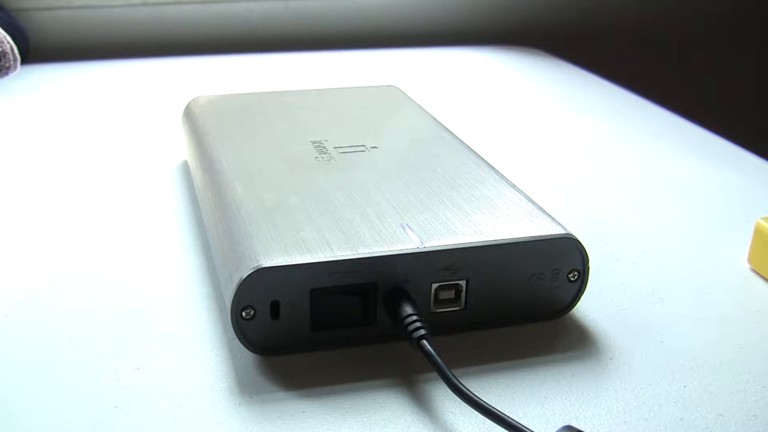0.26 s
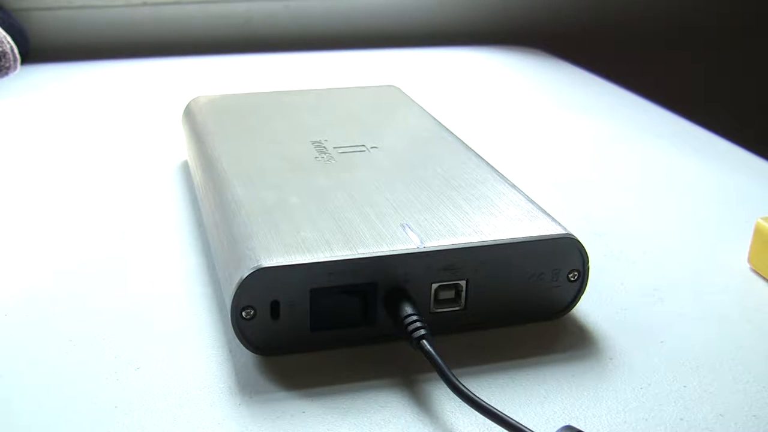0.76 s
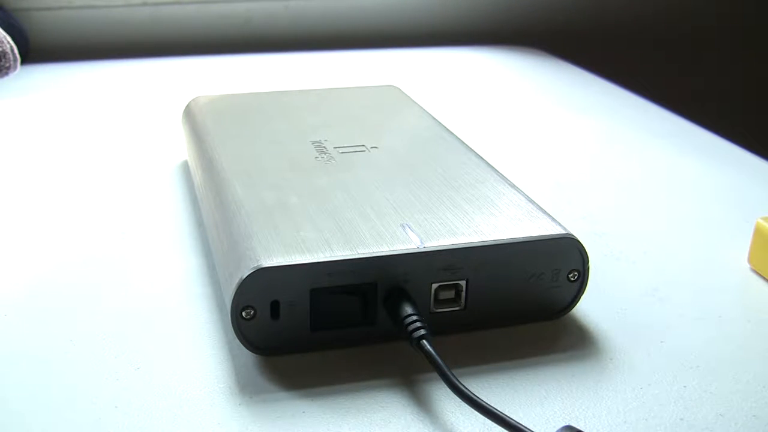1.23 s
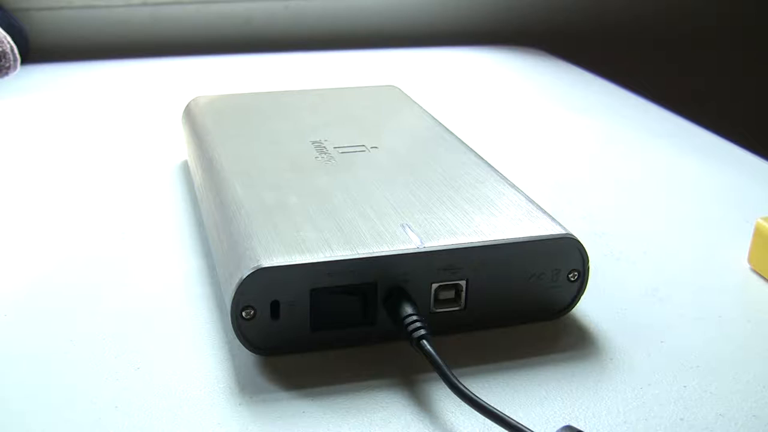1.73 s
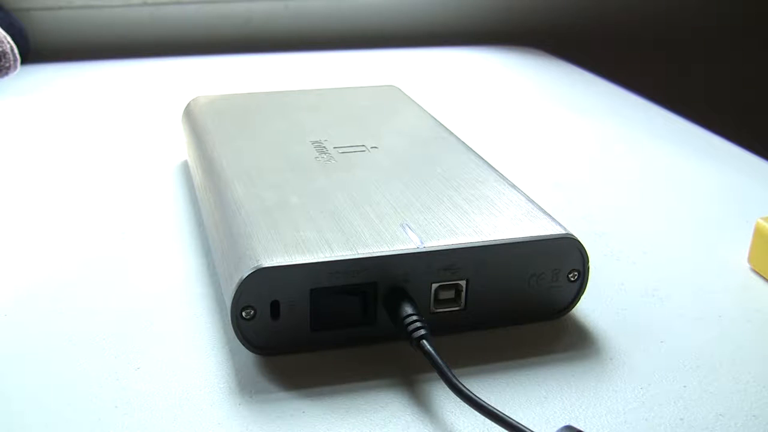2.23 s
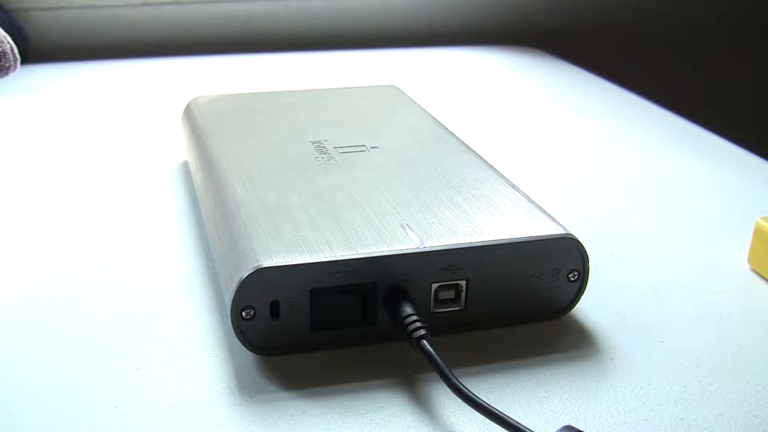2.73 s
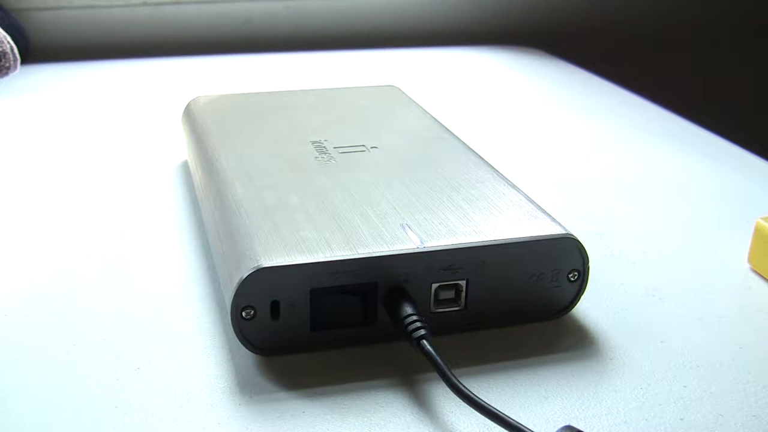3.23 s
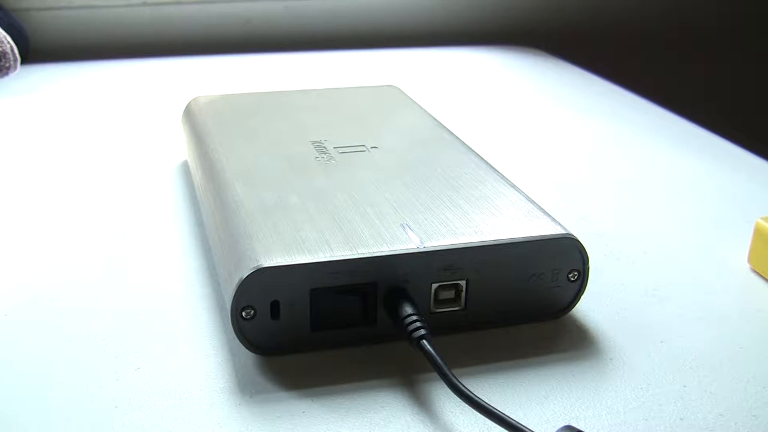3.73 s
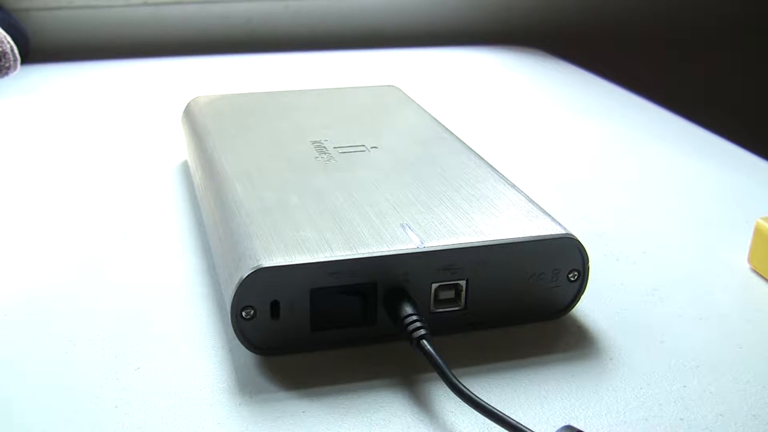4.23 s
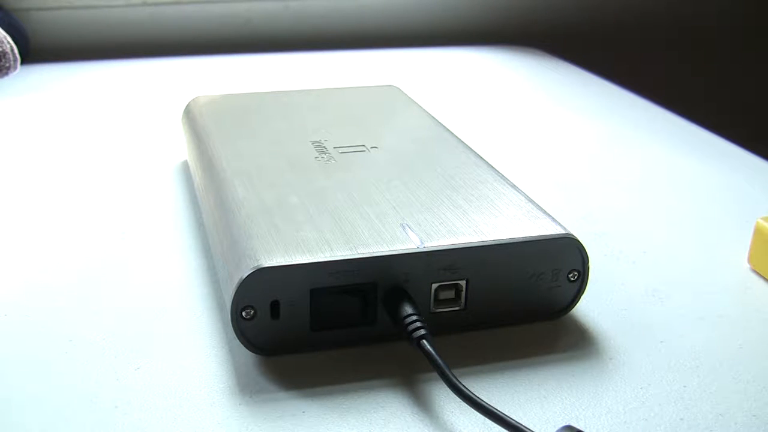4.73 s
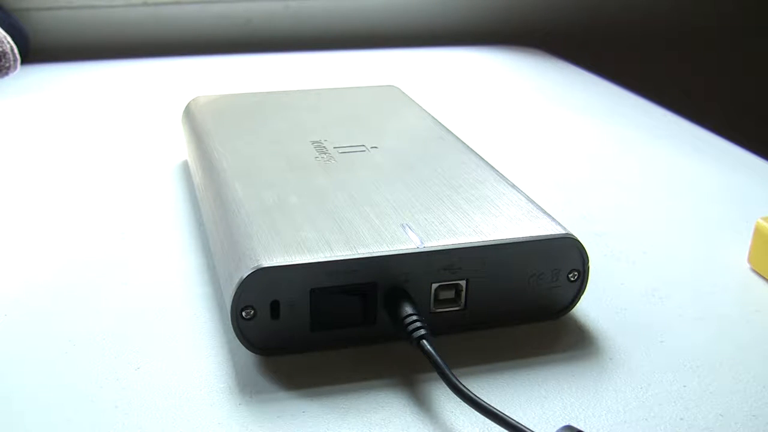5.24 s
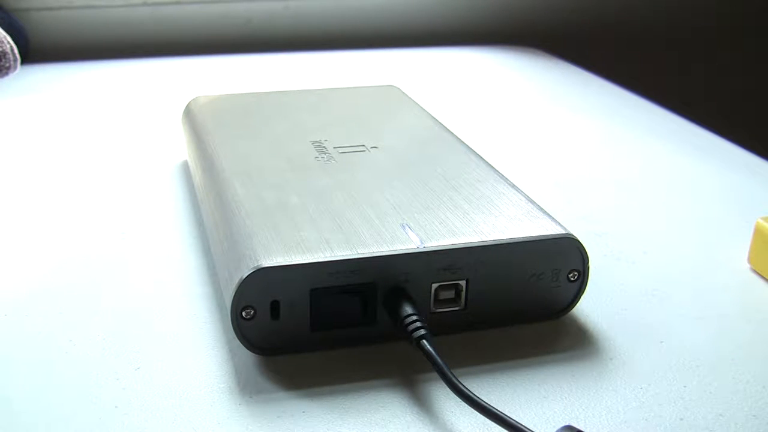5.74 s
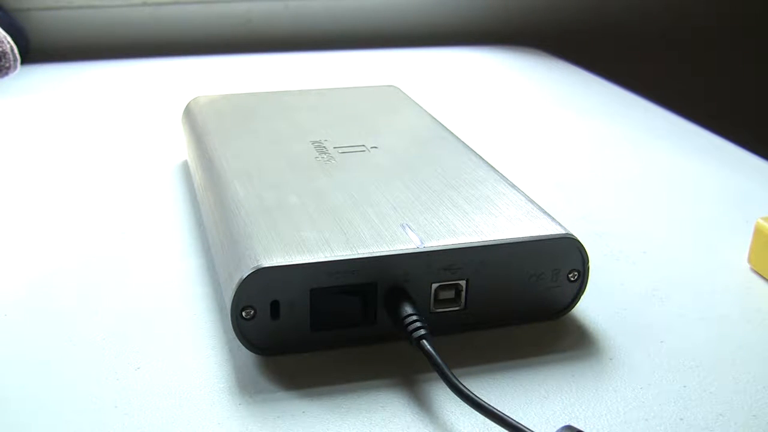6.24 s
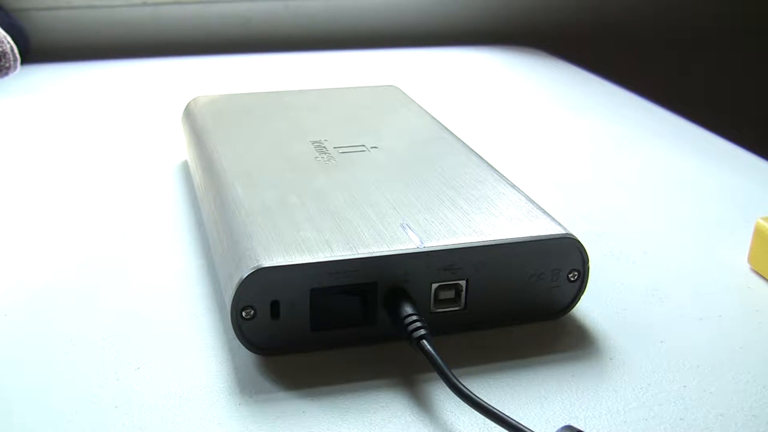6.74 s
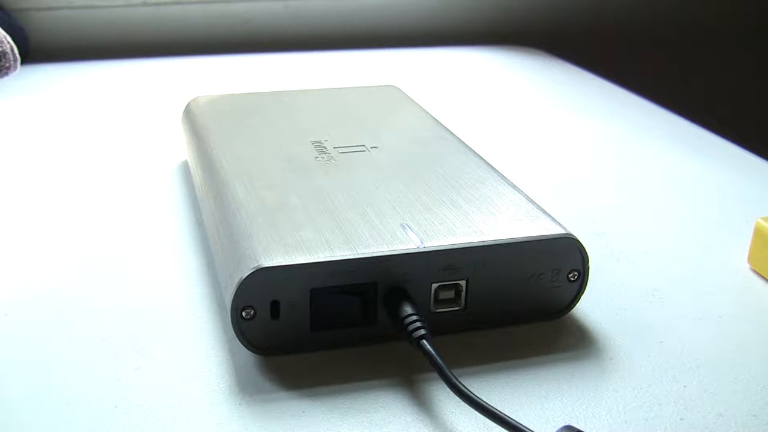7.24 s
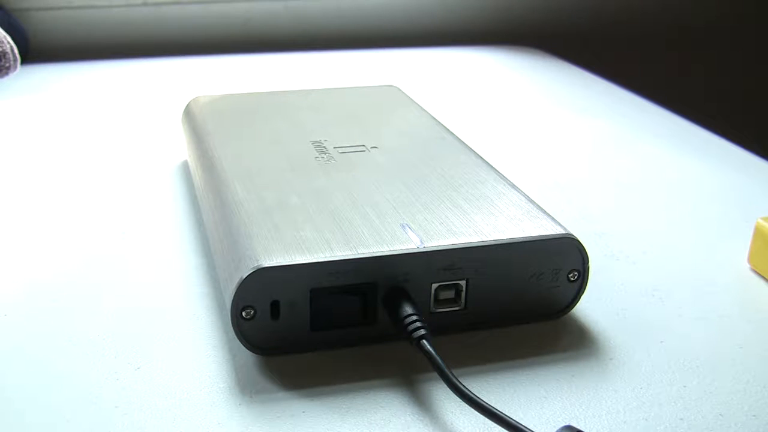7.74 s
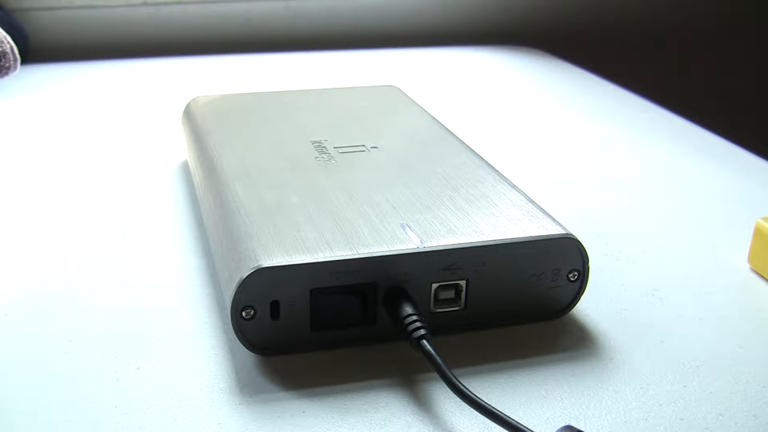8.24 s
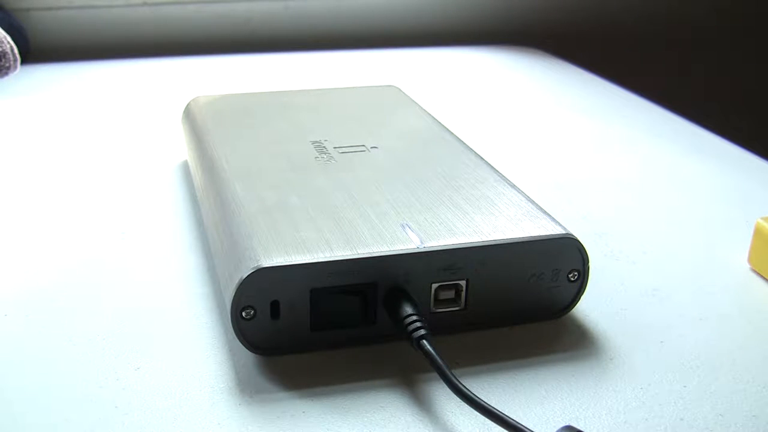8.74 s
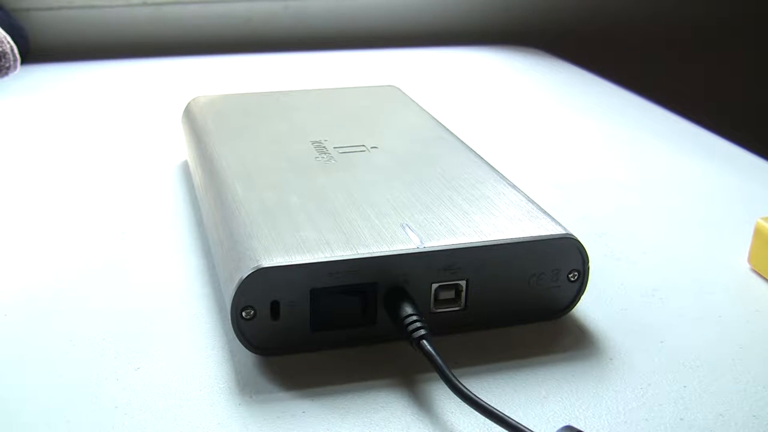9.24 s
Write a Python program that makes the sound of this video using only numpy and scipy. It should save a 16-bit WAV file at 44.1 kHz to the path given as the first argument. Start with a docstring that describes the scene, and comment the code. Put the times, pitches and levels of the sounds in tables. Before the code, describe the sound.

Close up in a quiet room, a small disk motor climbs to a steady whirr, followed by ten identical cycles of tick, clack, buzz and double knock.

```python
"""A failing hard drive in a metal case on a desk, heard close up through two microphone ports in a quiet room.
Over steady filtered noise and hums, the spindle whines up to speed: tones locked to its turn climb through
fixed resonances, then hold as a steady whine. The arm then repeats one cycle: two small ticks with faint
whistles, a load knock with a rebound, a short buzzing flight over the platters and a hard double knock at
its stop. Each contact rings decaying case modes and a noise rattle, and is reflected by desk and wall."""
import sys
import numpy as np
from scipy import signal
from scipy.fft import rfft, irfft
from scipy.io import wavfile

SR = 44100
rng = np.random.default_rng(int(sys.argv[2]) if len(sys.argv) > 2 else 0)


def log_audio(samples):
    """Write samples as a 16-bit WAV file to the path given in sys.argv[1]."""
    # one column per channel
    frames = np.atleast_2d(samples).T
    # limit to full scale, then quantise
    limited = np.clip(frames, -1, 1)
    pcm = np.round(limited * 32767).astype(np.int16)
    wavfile.write(sys.argv[1], SR, pcm)


N = 418068

# Noise spectra of room, platter wind and preamp hiss, relative: pitch_hz, level_db (per Hz)
AIR_MID_SPECTRUM = [(8, -11), (15, 6), (27, -10.5), (45, -8), (85, -12), (140, -14), (320, -27.5),
                    (650, -21.5), (1130, -26), (1400, -31), (2050, -29), (3620, -36), (4270, -35.5),
                    (4800, -39.5), (6640, -39.5), (9400, -39), (11700, -36.5), (13000, -53), (16000, -38)]
AIR_SIDE_SPECTRUM = [(8, -40), (15, -9), (31, -13), (85, -10), (140, -21), (390, -24.5), (940, -11),
                     (1480, -23), (1830, -19.5), (2200, -24.5), (3620, -23.5), (4250, -22), (4950, -32),
                     (6640, -24), (9400, -24.5), (12500, -37), (16000, -29.5)]
# Levels of that noise: mid_db, side_db
AIR_LEVELS = (-53.5, -58)
# Fuzzy hums in the room: pitch_hz, width_hz, left_db, right_db
ROOM_HUMS = [(18.8, 4.7, -51.5, -53.5), (57.6, 5, -63, -66), (171.7, 4.2, -69, -71.5),
             (238.7, 10, -76, -72), (1137, 43, -61.5, -80.5), (8300, 190, -76, -105)]
# Strong motor orders of the run-up, before the case response: turn_multiple, level_db
TORQUE_ORDERS = [(8, -67), (12, -65), (13, -76), (15, -72.5), (16, -63), (17, -87), (20, -67.5), (24, -61),
                 (25, -82), (26, -85), (28, -83), (32, -83)]
# How the case passes a climbing motor tone: pitch_hz, left_db, right_db
CASE_RESPONSE = [(664, -4, 3), (810, 5, 6), (880, -18, -7), (1130, -9, -12), (1310, -10, -14),
                 (1460, -24, -28), (1610, -7, 2.5), (1720, 3.5, 8), (1890, 1, 0.5), (2120, -4, -8),
                 (2350, 0.5, -10), (2540, -3, -2), (2790, 1.5, -29), (2900, -9, -12), (3300, 4, -10)]
# Resonances lit by the motor switching, relative: pitch_hz, width_hz, level_db, left_minus_right_db
SWITCHING_RESONANCES = [(4330, 190, -17, 3), (5560, 220, -22, 1), (7650, 320, -6, 4), (8050, 370, -7.5, -2),
                        (9350, 600, -14.5, 6), (10700, 530, -8.5, 8), (12150, 620, -8.5, 5),
                        (13300, 550, -20, 12), (14500, 460, -1.5, 29), (15530, 330, 2, -5)]
# Spindle orders: turn_multiple, left_minus_right_db, right_sign, heads_resting_db, heads_flying_db
SPINDLE_ORDERS = [(8, -11, -1, -72, -83), (13, -5, 1, -72, -74), (14, 0, -1, -77, -76),
                  (15, -3, -1, -67, -84), (16, 6, -1, -70, -71), (20, 6, 1, -84, -84), (32, 5, 1, -83, -83),
                  (33, -5, -1, -99, -74), (34, -7, -1, -84, -68), (35, -6, -1, -72, -72),
                  (36, 1, 1, -82, -82), (37, 3, 1, -83, -70), (58, -3, 1, -82, -69), (60, -1, -1, -82, -60),
                  (61, 1, 1, -71, -68), (62, -6, -1, -84, -69), (63, -1, 1, -74, -51),
                  (64, -5, 1, -72, -53), (65, 3, 1, -65, -58), (66, 0, 1, -69, -66), (67, 2, 1, -70, -69),
                  (68, 1, 1, -76, -64), (69, -3, 1, -70, -68), (70, 5, 1, -75, -65), (71, 16, -1, -77, -58),
                  (72, 8, -1, -95, -67), (73, -2, -1, -86, -72), (74, 3, 1, -83, -65), (75, 2, 1, -78, -59),
                  (76, 7, -1, -82, -69), (77, 12, 1, -88, -70), (78, 0, 1, -92, -75), (79, -2, 1, -93, -67),
                  (80, -4, 1, -87, -74), (81, 2, 1, -85, -68), (82, 5, 1, -87, -75), (83, 15, -1, -89, -72),
                  (85, 7, -1, -75, -76), (86, -1, 1, -90, -69), (88, 6, -1, -76, -73),
                  (91, 12, -1, -85, -63), (92, 14, -1, -89, -69), (93, -2, -1, -93, -71),
                  (94, -2, -1, -89, -74), (96, 8, 1, -75, -79), (97, 14, -1, -79, -65),
                  (98, 21, -1, -73, -64)]
# Phase lag of an order at the right port: right_sign: lag_rad
RIGHT_PORT_LAG = {1: np.pi / 4, -1: 3 * np.pi / 4}
# Lone faint spindle orders: turn_multiple, level_db
LONE_FAINT_ORDERS = [(25, -77), (124, -79)]
# Run of faint high orders: first_multiple, end_multiple (excluded), level_db, spread_db
FAINT_ORDER_RANGE = (99, 132, -94, 4)
# Arm cycles: load_knock_s, strength_db
ARM_CYCLES = [(2.362, 0.4), (3.1399, 0.6), (3.9175, 0.7), (4.6949, 0.5), (5.4729, 0.6), (6.2511, 0.7),
              (7.029, 0.6), (7.807, 0.4), (8.5861, 0.7), (9.3641, 0.8)]
# Contacts of one cycle: name: delay_s from the load knock
CONTACT_DELAYS = dict(first_tick=-.4425, second_tick=-.3942, unlatch=-.033, graze=.0305, rebound=.0337, park=.1668)
# Light contacts, relative to the cycle's strength: name: level_db
TICK_LEVELS = dict(first_tick=-5, second_tick=1.5, unlatch=-17, graze=-1)
# Flight after each rebound: start_s, end_s, rise_s, fall_s
FLIGHT_GATE = (.021, .121, .004, .014)
# Case modes: pitch_hz, t60_s, left_minus_right_db, right_sign (its size is unused), then the level
# struck by each kind of blow: park_db, park_thud_db, load_db, rebound_db, tick_db
CASE_MODES = [(184.7, 0.21, -15, 0.97, -52, -31, -40, -48.5, -66),
              (283.3, 0.16, -10, 0.81, -43, -61, -78, -53.5, -67.5),
              (589, 0.066, 17.5, -0.89, -33.5, -27, -42.5, -47.5, -65),
              (790, 0.082, -18, 1, -39, -51, -56, -41.5, -54.5),
              (1086, 0.032, 9.5, -0.88, -81, -28, -61, -35, -75),
              (1466, 0.017, 2.5, 1, -30, -23.5, -46, -32.5, -58),
              (1824, 0.042, -2, -1.1, -23.5, -31, -30, -35.5, -50),
              (2167, 0.043, 12.5, 1, -31, -20.5, -29.5, -21.5, -74),
              (2330, 0.021, -5, 1, -32, -26.5, -27.5, -42, -62),
              (2636, 0.029, 8.5, -1.1, -18, -24, -20.5, -31.5, -64),
              (2850, 0.081, -4, -0.98, -45, -95, -34, -39, -77),
              (3072, 0.029, 17, -0.78, -26, -34, -31.5, -56.5, -54),
              (3760, 0.017, 39, 0.78, -51, -37.5, -28, -36, -55),
              (4173, 0.026, 1, 1, -32.5, -39, -30, -39, -48),
              (4320, 0.022, 45, 0.68, -28, -81, -58, -49, -48.5),
              (4886, 0.013, 2, 1, -24, -51, -33, -64, -49),
              (5484, 0.039, -14, -1, -14.5, -53, -26.5, -43, -44),
              (5582, 0.021, 39, -1.17, -11.5, -94, -20, -40, -40),
              (5880, 0.036, 14, -1.1, -20, -106, -30, -61, -41.5),
              (6080, 0.0098, 44, -0.8, -12, -34, -18.5, -44, -43),
              (6653, 0.021, 18, -0.79, -20.5, -53, -33, -62, -50.5),
              (6780, 0.024, -8, 1, -32.5, -47, -55, -58, -83),
              (7850, 0.009, -4, 1, -43, -31, -32, -60, -41),
              (8760, 0.012, 22, -1, -26, -51, -31.5, -39, -45.5),
              (9550, 0.012, 0, 1, -26, -51, -51, -32, -53),
              (10330, 0.02, 12, -1.1, -20.5, -40, -30, -52, -58),
              (10720, 0.012, 23, 0.84, -23, -35, -25.5, -37, -47.5),
              (12460, 0.013, 23, 1, -60, -57, -62, -37, -71),
              (13900, 0.025, 19, -0.9, -62, -61, -55, -43, -55)]
# Blows in the same order: rise_s, rattle_db, rattle_t60_s, bounce_delay_s, bounce_db, free_ring_s (before the
# level shifts), level_shift_db (afterwards)
BLOW_KINDS = [(0.0011, -26.5, 0.05, .0028, -12.5, 0.0066, -13.5),
              (0.0011, -30, 0.025, 0.0025, -9.5, 0.0071, -8.5), (0.00061, -32, .025, .002, -18, 0.0038, -7),
              (0.0015, -29, 0.016, 0.0016, 0, 0.0055, -7), (0.00088, -42.5, 0.011, .003, -10.5, 0.0046, 1)]
# Slower rise of low modes, one per kind of blow: power (of LAG_HZ / pitch_hz)
LOW_MODE_LAG = (0.11, 0.11, 0.69, 0.29, 0.091)
# Dense small modes of screws and panels, relative: pitch_hz, level_db (per Hz)
RATTLE_SPECTRUM = [(200, -22), (600, -10), (1300, -6), (2300, -10), (4000, -4), (6500, -4), (9000, -5),
                   (11500, -8), (13000, -16), (16000, -20)]
# Reflections of desk and wall: level_db, t60_s, low_pass_hz
DESK_REFLECTIONS = (-20, 0.12, 3640)
# Whistles after the second tick: delay_s, pitch_hz, width_hz, level_db, length_s
SWISHES = [(.048, 8260, 300, -57, 0.004), (0.081, 7850, 484, -51.5, 0.0022)]

RUNUP_END = 1.69  # s, the motor drive drops to holding current
START_HZ, FULL_HZ = 82.9, 120.045  # turns per second
GAIN_HZ_PER_S, DRAG_HZ_PER_S2 = 23.9, 1.05
UNBALANCE_DB, UNBALANCE_POWER = -55, 1.1  # level at full speed; growth with speed
UNBALANCE_PAN_DB = (-1, -10)  # left minus right, at the start and at the end of the run-up
SWITCHING_DB, SWITCHING_HISS = -52.5, 0.7  # level; hiss relative to the edges
SEEK_DIP = 0.6  # share of the orders lost while the arm moves
SLOP_DB = 0.4  # blow-to-blow spread of strength
THUD_S = 0.0064  # from parking to the arm's second, duller contact
LAG_HZ = 5500  # modes below this rise more slowly
HISS_EDGE_HZ, EDGE_HZ = 15740, 16500
TURN = 2 * np.pi * np.arange(4097) / 4096  # rad, the angles of one whole turn


def gain_of(db):
    """Decibel law: level to amplitude ratio."""
    return 10 ** (np.asarray(db, float) / 20)


def evened(x):
    """Normalization to unit root-mean-square amplitude."""
    return x / np.sqrt(np.mean(x ** 2) + 1e-20)


def ports(pan_db, sign=1):
    """Level difference between ports: left and right gains of mean power 1."""
    ratio = gain_of(pan_db) ** 2
    left_right = np.array([np.sqrt(ratio), np.sign(sign) * np.ones_like(ratio)])
    return np.sqrt(2 / (1 + ratio)) * left_right


def coloured(x, points):
    """Linear filtering: shapes x by a spectrum interpolated over log frequency."""
    hz, db = np.transpose(points)
    bins = np.fft.rfftfreq(x.shape[-1], 1 / SR)
    curve_db = np.interp(np.log(bins + 1), np.log(hz + 1), db)
    return irfft(rfft(x) * gain_of(curve_db), x.shape[-1])


def peak(size, hz, width):
    """Resonance: a steep response curve on the bins of a signal of that size."""
    return 1 / (1 + ((np.fft.rfftfreq(size, 1 / SR) - hz) / width) ** 2)


def low_pass(x, edge_hz):
    """Band limiting by a steep linear-phase filter."""
    taps = signal.firwin(511, edge_hz, window=("kaiser", 9), fs=SR)
    return signal.oaconvolve(x, taps[None], "same")


def times(after_s):
    """Periodic action: moments of one contact in every cycle."""
    return np.array([s for s, _ in ARM_CYCLES]) + after_s


def gate(starts, start, end, rise, fall):
    """Amplitude envelope, 0 to 1, that opens and shuts after each start time."""
    t = np.arange(N) / SR
    corners = np.array([start, start + rise, end - fall, end])
    return sum(np.interp(t, s + corners, [0, 1, 1, 0]) for s in starts)


def read_turn(turn, angle):
    """Periodicity: reads the waveform of one turn at the running shaft angle."""
    return np.interp(angle % (2 * np.pi), TURN, turn)


def air():
    """Broadband noise in mid and side, with hums as narrow-band noise whose level wavers."""
    mid_db, side_db = AIR_LEVELS
    mid = gain_of(mid_db) * evened(coloured(rng.standard_normal(N), AIR_MID_SPECTRUM))
    side = gain_of(side_db) * evened(coloured(rng.standard_normal(N), AIR_SIDE_SPECTRUM))
    out = np.array([mid + side, mid - side])
    for hz, width, *db in ROOM_HUMS:
        hum = irfft(rfft(rng.standard_normal(N)) * peak(N, hz, width), N)
        out += gain_of(db)[:, None] * evened(hum)
    return out


def spindle():
    """Order analysis: every tone is a multiple of the turn rate, which rises and then holds."""
    t = np.arange(N) / SR
    ramp = np.minimum(t, RUNUP_END)
    speed = np.minimum(START_HZ + GAIN_HZ_PER_S * ramp - DRAG_HZ_PER_S2 * ramp ** 2, FULL_HZ)
    angle = 2 * np.pi * np.cumsum(speed) / SR
    steady = np.interp(t, [RUNUP_END - 0.01, RUNUP_END + 0.016], [0, 1])
    driven = torque(speed, angle) + switching(angle)
    holding = running_orders(angle) + faint_orders(angle)
    return unbalance(speed, angle) + (1 - steady) * driven + steady * holding


def unbalance(speed, angle):
    """Rotating unbalance: one cycle per turn, growing with speed, shakes the desk."""
    t = np.arange(N) / SR
    growth = gain_of(UNBALANCE_DB) * (speed / FULL_HZ) ** UNBALANCE_POWER
    pan_db = np.interp(t, [0, RUNUP_END], UNBALANCE_PAN_DB)
    return ports(pan_db) * np.sqrt(2) * growth * np.cos(angle)


def torque(speed, angle):
    """Forced vibration: motor orders swell and fade as they climb through the case response."""
    hz, *case_db = np.transpose(CASE_RESPONSE)
    out = np.zeros((2, N))
    for order, db in TORQUE_ORDERS:
        for port in range(2):
            level_db = db + np.interp(order * speed, hz, case_db[port])
            # a quarter cycle later at the right port
            tone = np.sqrt(2) * np.cos(order * angle - port * np.pi / 2)
            out[port] += tone * gain_of(level_db)
    return out


def switching(angle):
    """Harmonic excitation: commutation edges repeat every turn and climb through fixed resonances."""
    angle = angle[:2 * SR]  # outlasts the run-up
    size = len(angle)
    order = np.arange(30, 195)
    # random strengths, with every 4th and 12th order stronger
    strength_db = 2 * rng.standard_normal(len(order)) + 3 * (order % 4 == 0) + 2 * (order % 12 == 0)
    phase = 2 * np.pi * rng.random((len(order), 1))
    turn = gain_of(strength_db) @ np.cos(order[:, None] * TURN + phase)
    edges = evened(read_turn(turn, angle))
    drive = rfft(edges + SWITCHING_HISS * rng.standard_normal((2, size)))
    case = sum(gain_of(db) * ports(pan_db)[:, None] * peak(size, hz, width) ** 2
               for hz, width, db, pan_db in SWITCHING_RESONANCES)
    sound = gain_of(SWITCHING_DB) * evened(irfft(drive * case, size))
    return np.pad(sound, ((0, 0), (0, N - size)))


def running_orders(angle):
    """Superposition of shaft orders, whose levels depend on whether the heads rest, seek or fly."""
    flying = gate(times(CONTACT_DELAYS["rebound"]), *FLIGHT_GATE)
    seeking = gate(times(CONTACT_DELAYS["second_tick"]), 0.0, 0.061, 0.014, 0.014)
    resting = np.clip(1 - flying - SEEK_DIP * seeking, 0, 1)
    order, pan_db, sign, *state_db = np.transpose(SPINDLE_ORDERS)
    lag = np.array([0 * sign, [RIGHT_PORT_LAG[s] for s in sign]])
    phase = 2 * np.pi * rng.random(len(order)) - lag
    waves = np.sqrt(2) * np.cos(order[:, None] * TURN + phase[..., None])  # port, order, angle
    out = np.zeros((2, N))
    for db, share in zip(state_db, (resting, flying)):
        turns = np.einsum("po,pos->ps", ports(pan_db) * gain_of(db), waves)
        out += share * np.array([read_turn(turn, angle) for turn in turns])
    return out


def faint_orders(angle):
    """Line spectrum: weak thin orders of the running spindle, stronger at the left port."""
    first, end, db, spread_db = FAINT_ORDER_RANGE
    order = np.append(np.arange(first, end), [k for k, _ in LONE_FAINT_ORDERS])
    run_db = db + spread_db * rng.standard_normal(end - first)
    level_db = np.append(run_db, [d for _, d in LONE_FAINT_ORDERS])
    phase = 2 * np.pi * rng.random((len(order), 1))
    turn = gain_of(level_db) @ (np.sqrt(2) * np.cos(order[:, None] * TURN + phase))
    return ports(6.0)[:, None] * read_turn(turn, angle)


def arm():
    """Impulse excitation: each contact triggers its blow, and reflections follow."""
    ticks = [(CONTACT_DELAYS[name], db) for name, db in TICK_LEVELS.items()]
    park, rebound = CONTACT_DELAYS["park"], CONTACT_DELAYS["rebound"]
    # contacts of each kind of blow: delay_s from the load knock, level_db
    kinds = [[(park, 0)], [(park + THUD_S, 0)], [(0, 0)], [(rebound, 0)], ticks]
    cycle_db = np.array([db for _, db in ARM_CYCLES])
    out = np.zeros((2, N))
    for kind, contacts in enumerate(kinds):
        hits = np.zeros(N + SR)
        for after_s, db in contacts:
            slop_db = SLOP_DB * rng.standard_normal(len(ARM_CYCLES))
            moments = np.round(times(after_s) * SR).astype(int)
            hits[moments] = gain_of(db + cycle_db + slop_db)
        out += signal.oaconvolve(hits[None], blow(kind), axes=1)[:, :N]
    return out + reflections(out)


def blow(kind):
    """Modal ringing: a contact excites decaying case modes and a rattle, and bounces once."""
    hz, t60, pan_db, sign, *struck_db = np.transpose(CASE_MODES)
    rise, rattle_db, rattle_t60, bounce_s, bounce_db, free_s, shift_db = BLOW_KINDS[kind]
    t = np.arange(SR // 6) / SR
    modes = np.sin(2 * np.pi * hz[:, None] * t) * gain_of(-60 * t / t60[:, None])
    slowness = np.maximum(LAG_HZ / hz[:, None], 1) ** LOW_MODE_LAG[kind]
    modes *= 1 - np.exp(-(t / rise / slowness) ** 2)
    ring = (ports(pan_db, sign) * gain_of(struck_db[kind])) @ modes
    rattle = evened(coloured(rng.standard_normal(ring.shape), RATTLE_SPECTRUM))
    rattle *= gain_of(rattle_db - 60 * t / rattle_t60)
    sound = ring + rattle * (1 - np.exp(-(t / rise) ** 2))
    sound = sound + gain_of(bounce_db) * np.roll(sound, round(bounce_s * SR), axis=1)
    return sound * gain_of(np.interp(t, [free_s, free_s + 0.0039], [0, shift_db]))


def reflections(direct):
    """Early reflection: sparse, dulled, decaying echoes from desk and wall."""
    level_db, t60, dull_hz = DESK_REFLECTIONS
    t = np.arange(SR // 5) / SR
    taps = rng.choice([-1., 1.], (2, len(t)))
    taps *= (rng.random((2, len(t))) < 0.05) * (t > 0.003)
    taps = signal.lfilter(*signal.butter(2, dull_hz, fs=SR), taps) * gain_of(-60 * t / t60)
    taps *= gain_of(level_db) / np.linalg.norm(taps, axis=1, keepdims=True)
    return signal.oaconvolve(direct, taps, axes=1)[:, :N]


def swish():
    """Narrow-band noise in brief bell-shaped bursts: whistles of the arm as it settles."""
    t, out = np.arange(N) / SR, np.zeros((2, N))
    for after, hz, width, db, length in SWISHES:
        whistle = evened(irfft(rfft(rng.standard_normal((2, N))) * peak(N, hz, width), N))
        starts = times(CONTACT_DELAYS["second_tick"]) + after
        bursts = sum(np.exp(-((t - s) / length) ** 2) for s in starts)
        out += gain_of(db) * whistle * bursts
    return out


def scene():
    """Superposition: the steady sounds and whistles end a little below the knocks in the treble."""
    return low_pass(air() + spindle() + swish(), HISS_EDGE_HZ) + arm()


def record(dry):
    """Band limiting of the whole sound at the receiver."""
    return low_pass(dry, EDGE_HZ)


dry = scene()
out = record(dry)
log_audio(out)
```